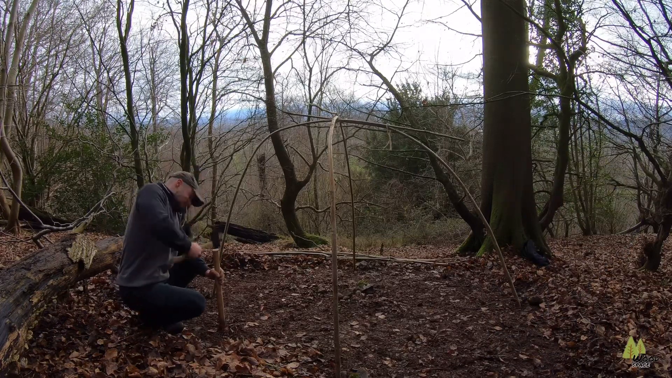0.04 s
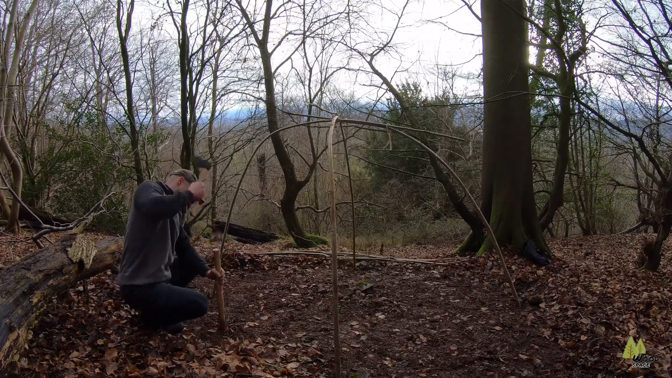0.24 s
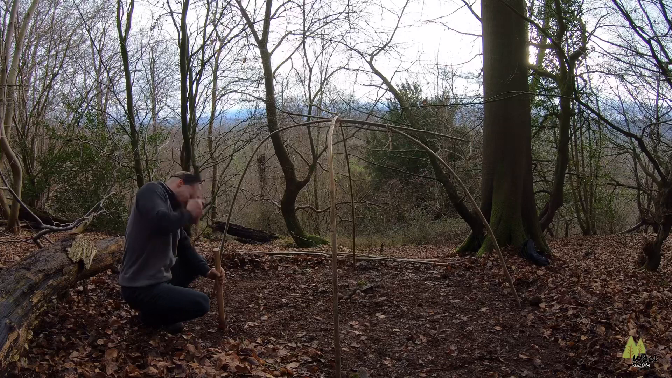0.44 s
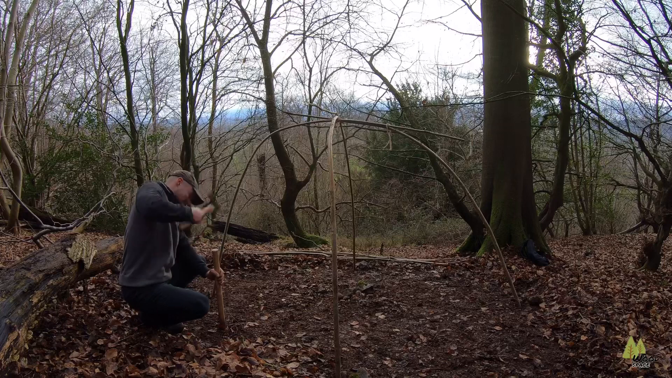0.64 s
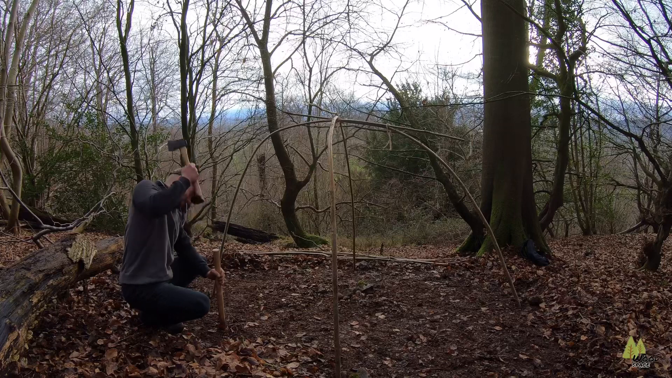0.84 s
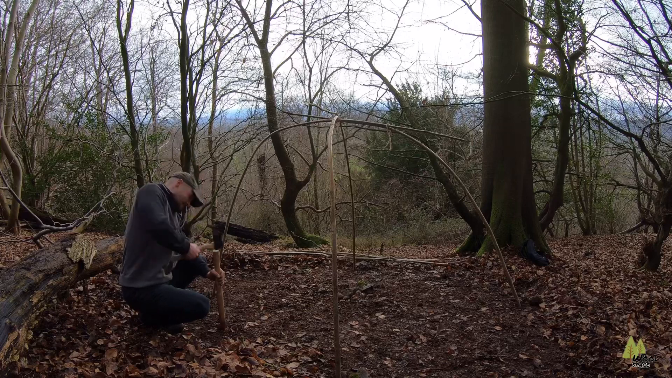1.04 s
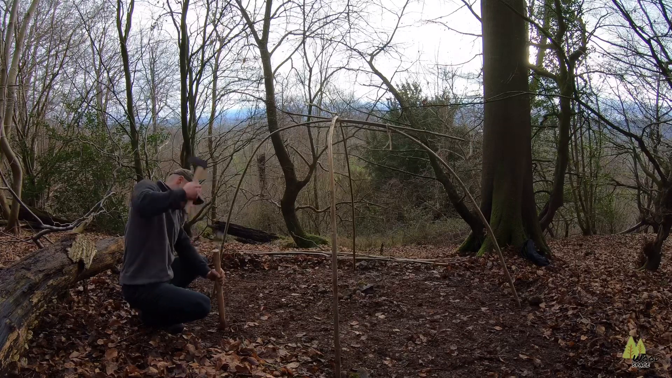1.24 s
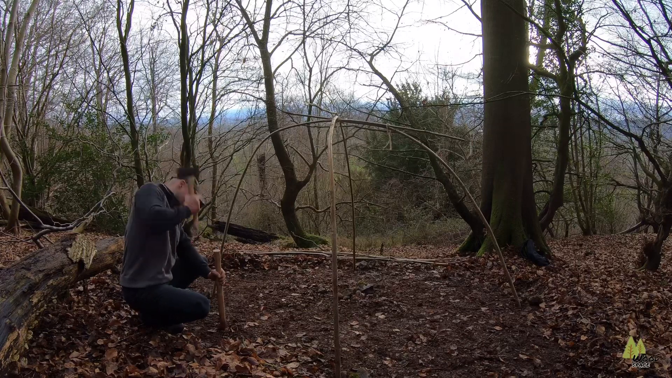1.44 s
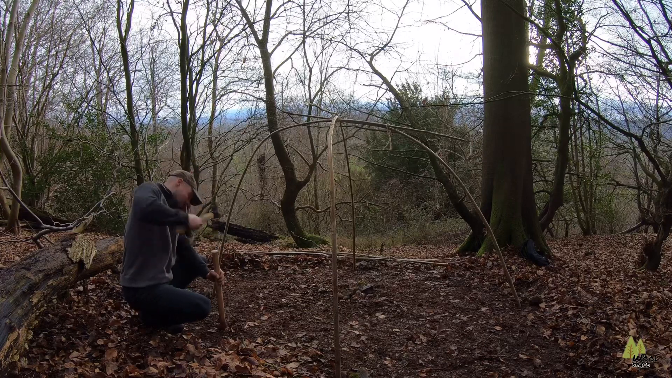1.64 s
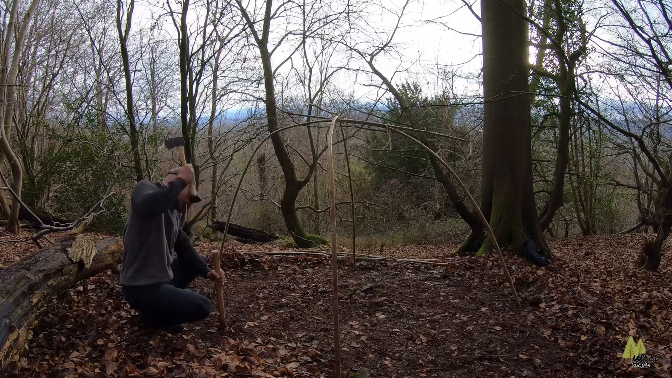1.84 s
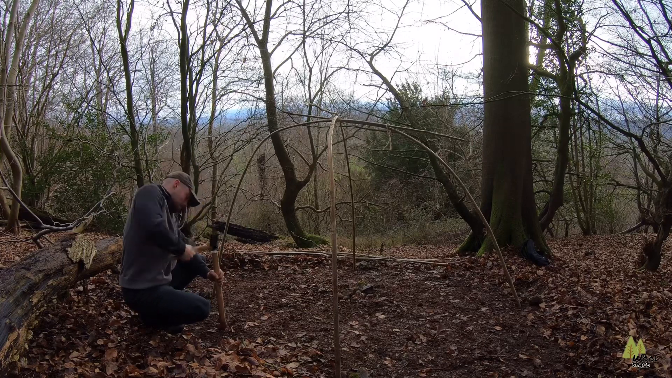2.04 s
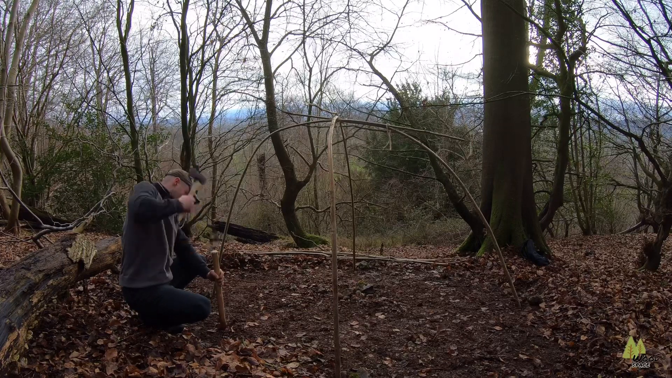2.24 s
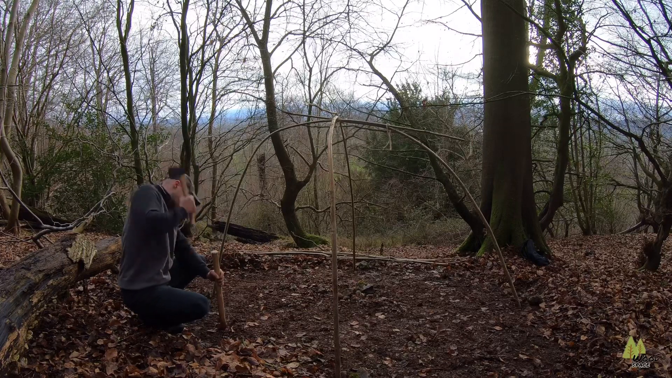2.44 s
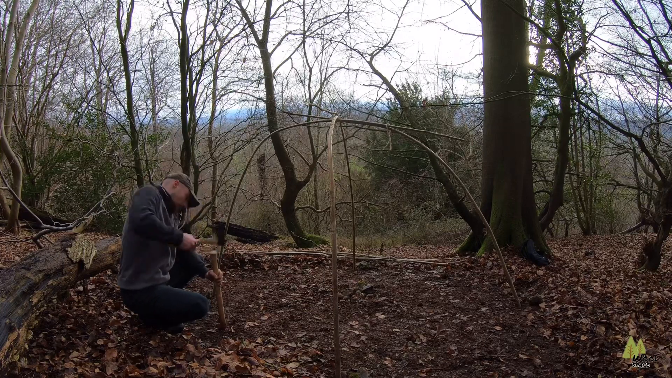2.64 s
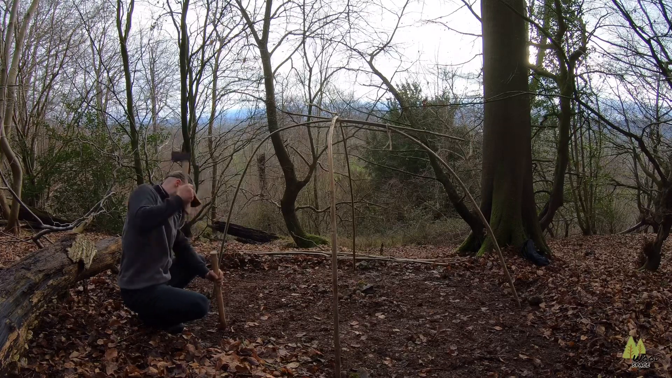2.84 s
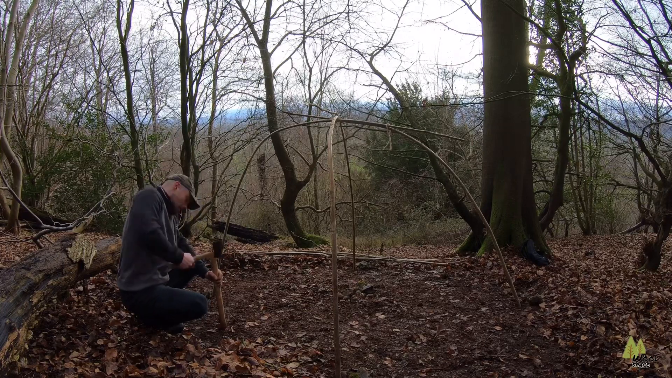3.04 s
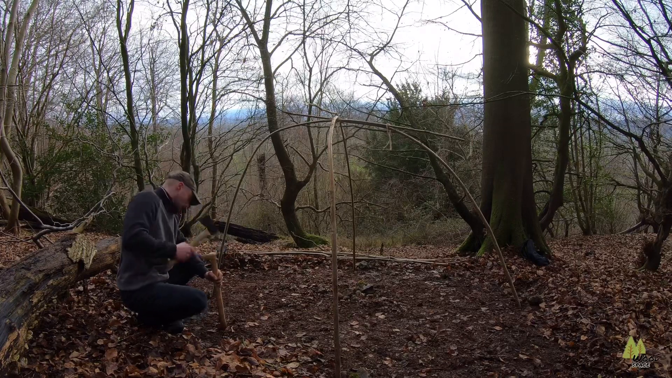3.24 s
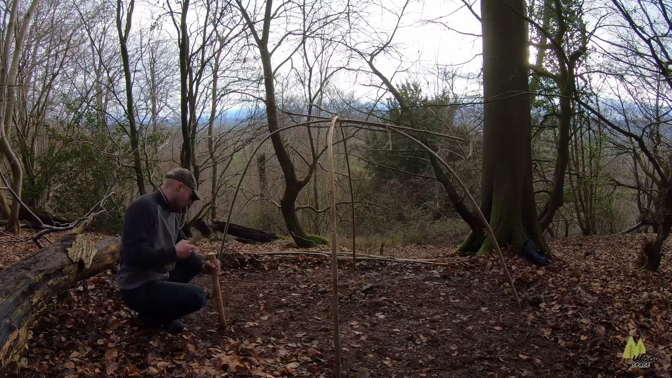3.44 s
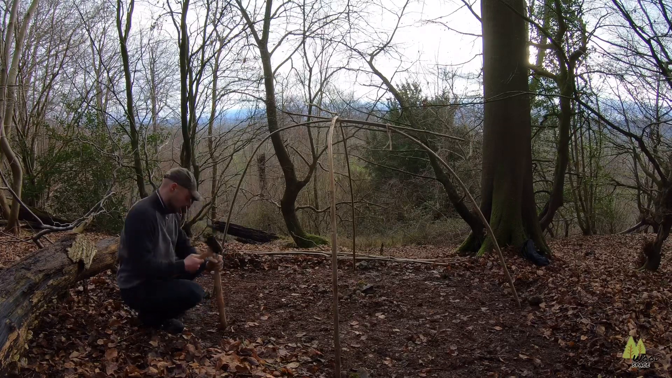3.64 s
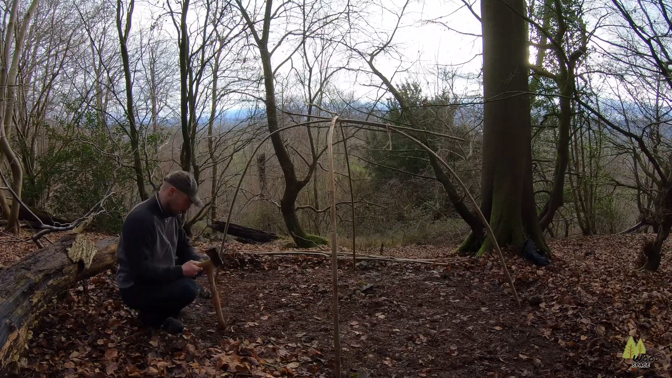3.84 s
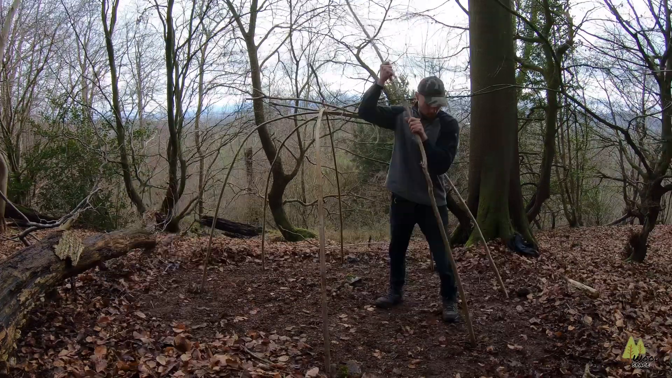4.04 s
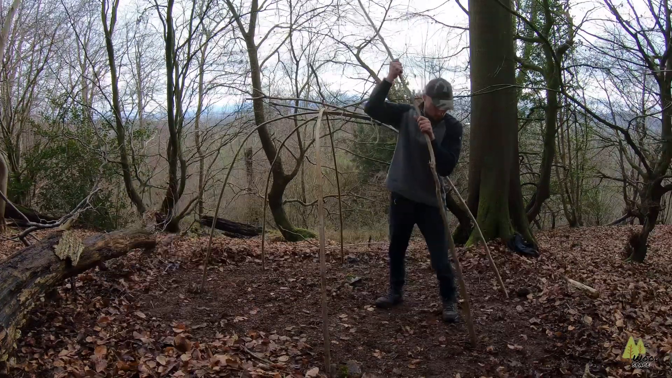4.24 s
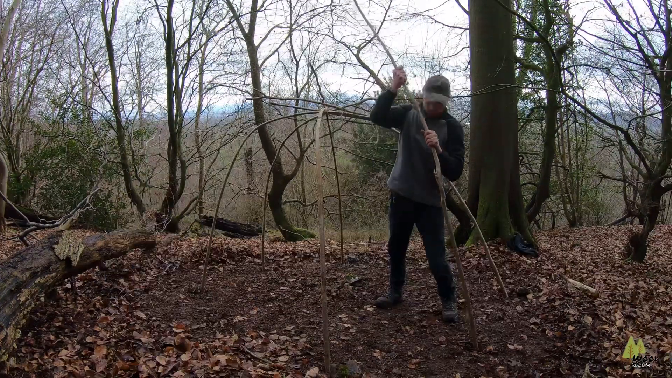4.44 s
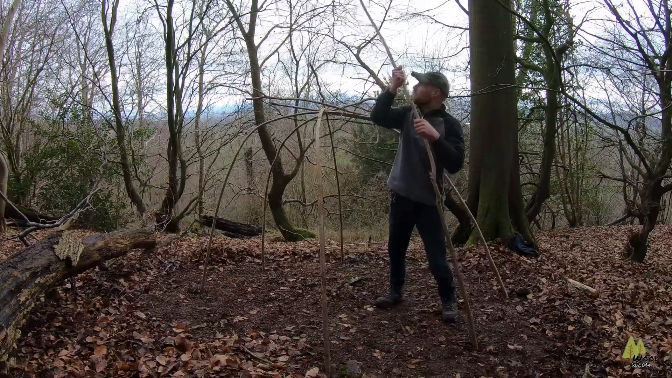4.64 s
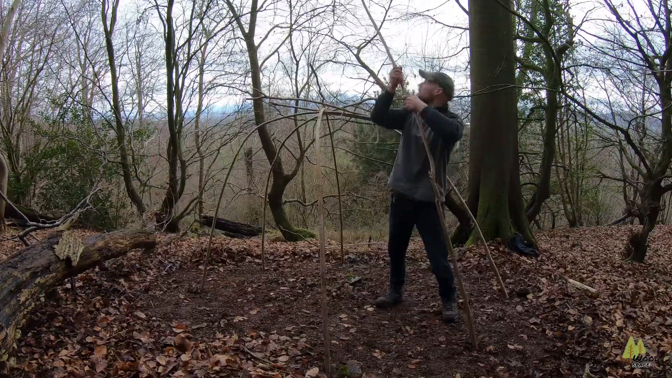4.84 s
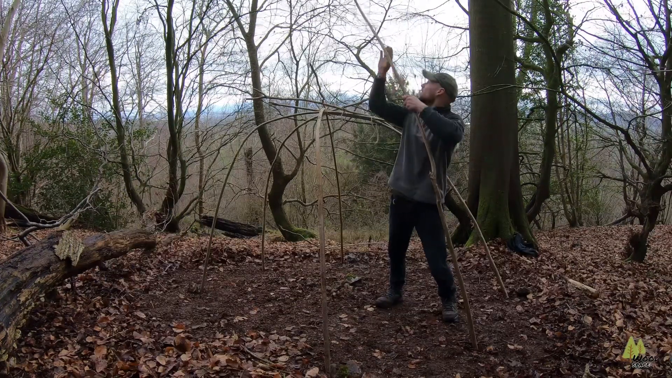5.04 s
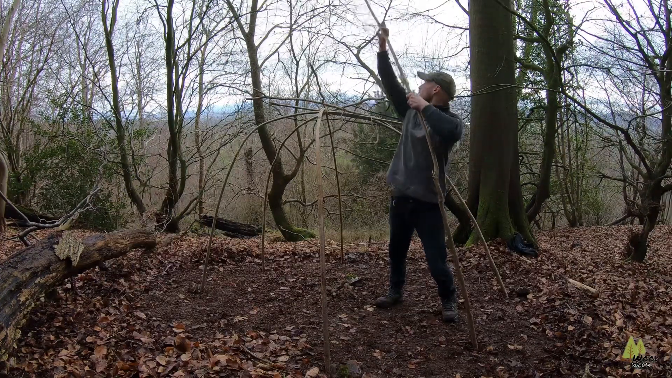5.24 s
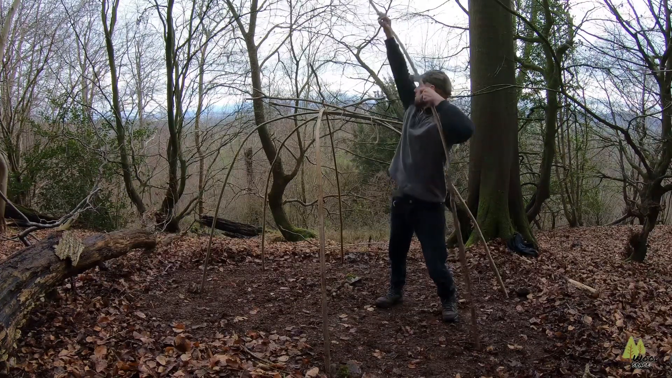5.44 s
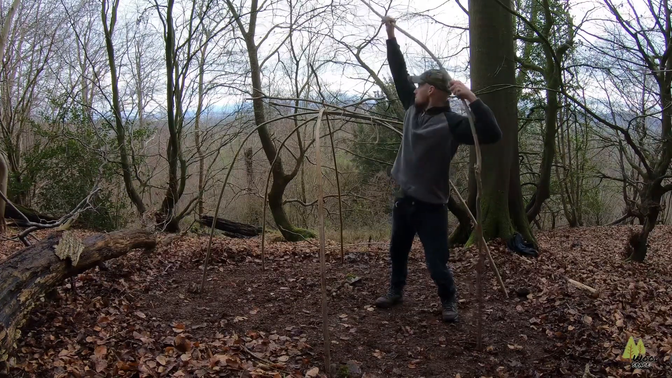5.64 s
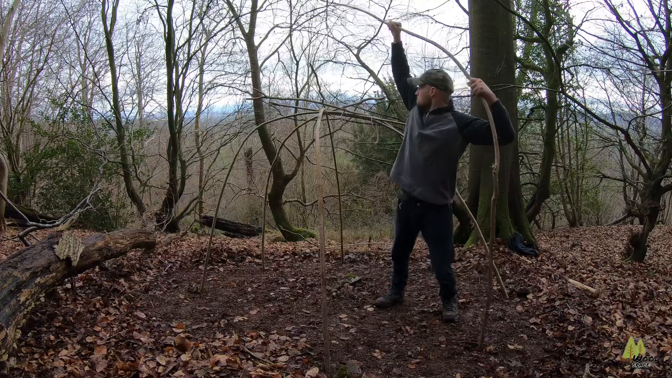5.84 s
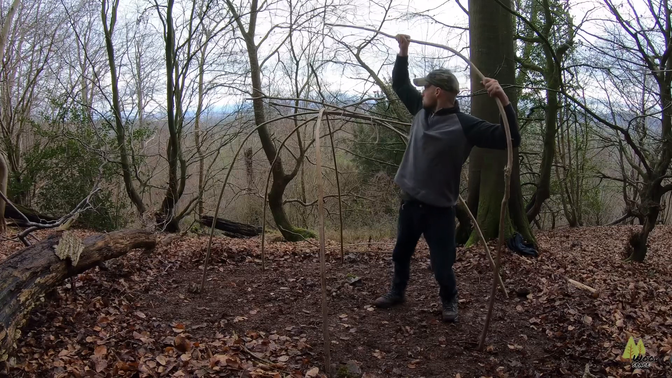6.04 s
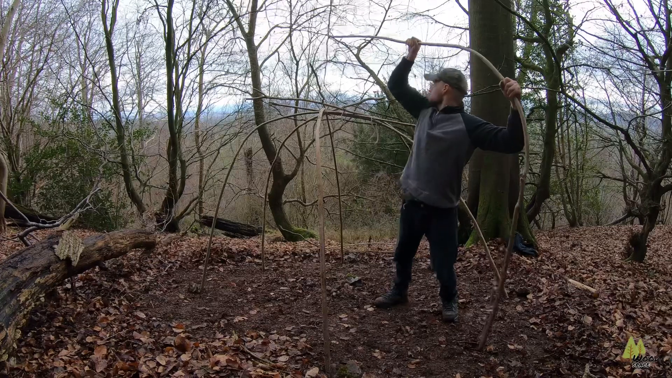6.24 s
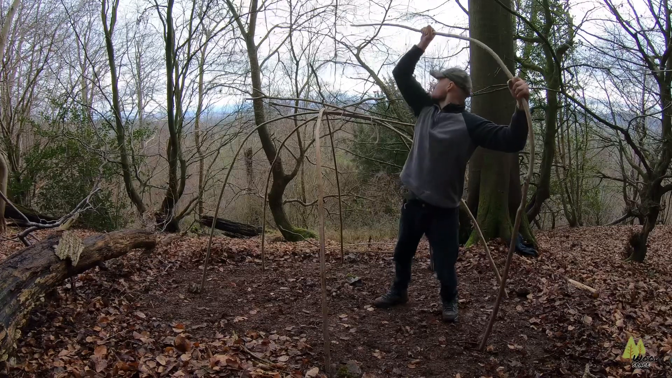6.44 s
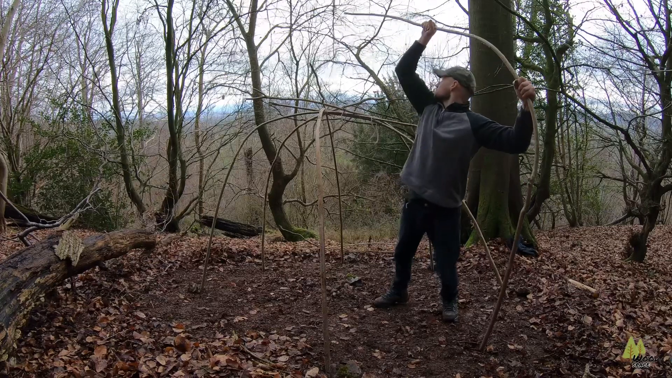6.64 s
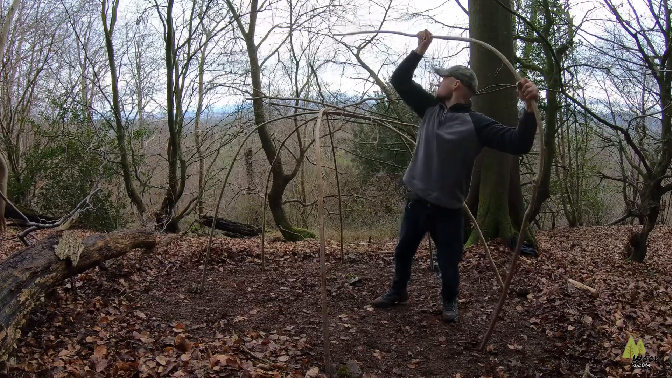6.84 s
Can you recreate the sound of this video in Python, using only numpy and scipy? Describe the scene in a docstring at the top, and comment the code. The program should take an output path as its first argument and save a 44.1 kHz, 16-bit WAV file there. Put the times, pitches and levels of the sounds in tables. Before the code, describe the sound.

A stake is hammered into soil twice a second with ringing woodland echoes; after a brief silence, a pole crunches in and twigs creak.

```python
"""A wooden stake takes seven blows into a forest floor: damped modes crack, soil modes thump and
decaying noise scatters back from the trunks, with an earlier blow's echo still fading at the start.
After a moment of silence a long pole is jabbed into the ground and bent over, with noise bursts for
crunch and snaps, while boots shift and grainy noise rustles as dry leaves.
Distant air in coloured noise and a few thin, wavering sine bird whistles lie behind."""
import sys
import numpy as np
from scipy import signal
from scipy.fft import rfft, irfft, next_fast_len
from scipy.io import wavfile
from scipy.ndimage import uniform_filter1d

SR = 44100
rng = np.random.default_rng(int(sys.argv[2]) if len(sys.argv) > 2 else 0)


def transcribe(signal):
    """Save signal, clipped to [-1, 1], as a 16-bit WAV file at the path in sys.argv[1]."""
    frames = np.atleast_2d(signal).T
    limited = np.clip(frames, -1, 1)
    pcm = np.round(limited * 32767).astype(np.int16)
    wavfile.write(sys.argv[1], SR, pcm)


N = 304274
T = np.arange(N) / SR
AGE = T[:SR // 4]  # time since a short sound began, in seconds
ECHO_AGE = T[:SR]  # the same for longer sounds

# All levels inside a layer are relative, before that layer's mix level and panning.
# distant air: (frequency [Hz], level [dB])
AIR_COLOUR = [(25, -17), (70, -5.5), (115, -8.5), (165, 3), (300, -5.5), (520, -10.5), (820, -4.5),
              (1350, -10), (2000, -21), (3300, -26.5), (5000, -28.5), (7000, -33.5), (8200, -46.5),
              (14000, -59)]
AIR_BEFORE_DB, AIR_AFTER_DB = -62, -60  # before and after the silence ends
# moment of silence: (start [s], end [s])
SILENCE = (4.062, 4.112)

# scatter from the trunks: (frequency [Hz], level [dB], 60 dB decay time [s])
TRUNK_ECHO = [(250, -20.5, .7), (548, -19.5, .8), (889.6, -7, .75), (1593, 0.5, .85), (2600, -1, 1),
              (4000, -1, .92), (5200, -7, .62), (6600, -10, .52), (7600, -6.5, .45), (8430, -18.5, .44),
              (10500, -19, .44), (12000, -39, .44)]
ECHO_DB, EARLIER_BLOW_S = -44.5, 0.39  # the earlier blow fell this long before the start

# blows on the stake: (time [s], crack level [dB], pitch factor [1],
# knock frequency before slight lowering [Hz], knock level [dB], rasp level [dB], thump level [dB],
# early echo boost [dB], echo edge [Hz], echo tilt [dB per octave], echo hold [s])
BLOWS = [(0.064, -1.5, 1.033, 796, -13.5, -22, -17, 0.5, 4200, 1.3, 0.12),
         (0.555, -3.5, 1.02, 817, -14, -16.5, -15.7, 3.5, 3850, 0, .12),
         (1.0627, -3.5, 1.0, 845, -13, -25, -15.5, 5, 3897, -0.6, .12),
         (1.5613, -2, 1.024, 830, -17, -17, -15, 4.5, 4100, -0.25, .12),
         (2.057, -3.5, 0.99, 772, -15, -16.5, -15.5, 11, 3460, -1.1, 0.1),
         (2.572, -12, 0.95, 1030, 0, -7, -13.7, 21, 2100, -1, .035),
         (3.058, -7.5, .95, 1090, -7.5, -22, -15.5, 13.5, 4300, -1.4, 0.093)]
# stake damped by hand and soil: (frequency before pitch factor [Hz], level [dB], swell time [ms])
STAKE_MODES = [(1670, -14.5, 1.3), (2300, -2, 1.15), (3473, -5.5, 0.96), (4600, -18, 0.68),
               (5600, -26, 0.59), (8500, -36, .5)]
KNOCK_SWELL_MS = 1.4  # the hollow knock peaks this late
# crushed fibres at the stake's head: (frequency [Hz], level [dB])
RASP_COLOUR = [(200, -6), (380, 0), (560, -10), (1400, 2), (2500, -1), (4300, 0.5), (5500, -8.5),
               (8000, -21), (11000, -32.5), (15000, -50)]
# the stake's brief buzz with the crack: (frequency [Hz], level [dB])
BUZZ_COLOUR = [(500, -28), (850, -4), (1150, -12), (1550, -1.5), (2400, 1), (4200, -1), (5200, -9.5),
               (8000, -20.5), (14000, -42)]
BUZZ_DB = -31.5  # under the crack level
# springy soil: (frequency [Hz], level [dB], swell time [ms], steepness [1])
SOIL_MODES = [(177, 2, 9.3, 6), (71.03, -18, 15, 1.4), (87.04, -26.5, 11, 2), (162, -16, 16, 1.8),
              (248.4, -14.5, 7.1, 2), (300, -17, 4.5, 2.6)]
# thump and weaker repeats: (delay after the soil lag [s], level [dB])
THROBS = [(0, 3), (0.0414, -19.5), (0.062, -32), (0.092, -30.5)]
SOIL_LAG_S = 0.0021

# bird whistles: (time [s], length [s], start frequency [Hz], end frequency [Hz], level [dB])
BIRD_WHISTLES = [(0.385, 0.26, 7700, 6950, -85), (0.822, 0.13, 7180, 7040, -86),
                 (2.83, 0.14, 4130, 4080, -74), (3.465, 0.27, 7220, 7050, -76),
                 (3.799, 0.26, 5170, 5200, -78)]

# dry leaves: (frequency [Hz], level [dB])
LEAF_COLOUR = [(1200, -22), (2300, -7), (3500, 1), (4600, -4.5), (6200, -1.5), (8000, -9.5), (10000, -15),
               (12000, -34), (15000, -32)]
# movements that stir leaves and clothing: (time [s], length [s], level [dB])
STIRS = [(3.392, 0.088, -73.5), (4.45, 0.44, -68), (4.87, .21, -66), (5.219, 0.24, -65), (5.597, 0.15, -62)]
STIR_ATTACK_S, STIR_RELEASE_S = 0.029, 0.024
FIDGET_DB = -69.5  # middle level of the faint rustle while the pole is handled

# the pole's shaft: (frequency [Hz], level [dB], swell time [ms])
SHAFT_MODES = [(275, -8, 11), (441, -14, 6), (1570, -16, 2.5)]
# litter under the pole's point: (frequency [Hz], level [dB])
CRUNCH_COLOUR = [(150, 0), (330, 8.5), (500, -1), (800, -3.5), (1550, -1.5), (2100, -7), (3200, -2),
                 (4200, -12.5), (6000, -9.5), (8000, -22.5), (10000, -24), (15000, -64)]
# the pole's clacking wood: (frequency [Hz], level [dB], swell time [ms])
POLE_MODES = [(2450, -13, 1.8), (3330, -1, 1.7), (3800, -5.5, 1.6), (900, -14, 1.5)]
# the pole rammed home; its soil thump plays at the pitch factor
JAB_S, JAB_THUMP_DB, JAB_CRUNCH_DB, JAB_ECHO_DB, JAB_PITCH = 4.3885, -16.5, -19.5, -49.5, .9
CLACK_S, CLACK_DB = 4.422, -17  # it clacks as it rebounds

# creaking wood and snapping twigs: (time [s], level [dB], centre [Hz], hiss level [dB])
SNAPS = [(4.4219, -33.5, 2500, -15), (4.6089, -48, 3260, -.5), (5.1338, -62, 7010, -11),
         (5.234, -63, 4520, 8), (5.3947, -57, 4000, 5), (5.5944, -44, 2990, 6.5), (5.615, -48, 3110, 2.5),
         (5.6408, -45, 2830, -2), (5.7145, -45, 2700, -7), (5.731, -49, 3030, -0.5),
         (5.7435, -50, 2600, -3), (5.81, -54.5, 2950, -4.5), (5.935, -46, 2600, -11),
         (5.95, -44.5, 2950, -14), (5.961, -50, 2600, -5), (5.9867, -37.5, 2470, -30),
         (6.0544, -45, 2650, -17), (6.159, -57, 2800, -10), (6.6545, -59, 5486, 5.5)]
# leaves shaken by a snap: (frequency [Hz], level [dB])
SNAP_HISS_COLOUR = [(500, -7), (1500, 1), (3000, -0.5), (6200, 7.5), (9500, -6.5), (12000, -31.5),
                    (15000, -28)]
SNAP_SWELL_MS = 1.53

# litter crushed by a boot: (frequency [Hz], level [dB])
LITTER_COLOUR = [(100, -20), (270, 8), (480, -8), (950, 3), (1300, -9), (2800, -6), (4200, -14),
                 (8000, -21), (12000, -54)]
STEP_S, STEP_LENGTH_S, STEP_DB, STEP_ATTACK_S, STEP_RELEASE_S = 5.915, .1, -49.5, .032, .055
# low rumble while the man shifts his weight: (frequency [Hz], level [dB])
RUMBLE_COLOUR = [(15, -5), (35, -4), (60, -6.5), (100, -12), (200, -14.5), (500, -68)]
RUMBLE_S, RUMBLE_LENGTH_S, RUMBLE_DB = 5.92, 0.916, -60.5
# soft, deep bumps in the rumble: (time [s], level [dB], frequency [Hz], swell time [ms])
BUMPS = [(6.054, -49, 40, 34), (6.628, -40.5, 45, 11.4), (6.725, -51.5, 42, 23)]

CLIP_LEVEL, TOP_HZ = .86, 16400


def undb(db):
    """Decibels to gain."""
    return 10 ** (np.asarray(db) / 20)


def unit(x):
    """Scale to rms 1."""
    return x / np.sqrt(np.mean(x ** 2))


def add(out, s, x):
    """Mix a sound in at time s."""
    i = int(s * SR)
    out[:, i:i + x.shape[-1]] += x[..., :N - i]


def on_log(hz, points):
    """Read (Hz, value) points on a log-frequency axis."""
    f, value = np.transpose(points)
    return np.interp(np.log(hz + 1), np.log(f), value)


def colour(x, points):
    """Weight a sound's spectrum by (Hz, dB) points, at rms 1."""
    size = next_fast_len(x.shape[-1], real=True)
    gain = undb(on_log(np.fft.rfftfreq(size, 1 / SR), points))
    shaped = irfft(rfft(x, size) * gain, size)
    return unit(shaped[..., :x.shape[-1]])


def pan(x, left_db):
    """Lean a sound to the left by a level difference; negative leans right."""
    return x * undb(np.array([[left_db], [-left_db]]) / 2)


def noise(size, side_db, grain_db=0):
    """Stereo noise; widely scattered sample sizes turn it into grains."""
    grains = undb(grain_db * rng.standard_normal(size))
    mid, side = rng.standard_normal((2, size)) * grains
    return unit(mid + undb(side_db) * np.array([side, -side]))


def walk(rate, size):
    """Smoothed random steps at rms 1, for slow chance."""
    k = int(SR / rate)
    steps = np.repeat(rng.standard_normal(size // k + 1), k)
    return unit(uniform_filter1d(steps, k)[:size])


def swell(ms, steepness):
    """Envelope that builds to 1 in the given time and dies away."""
    u = AGE * 1000 / ms
    return (u * np.exp(1 - u)) ** steepness


def gesture(s, length_s, attack_s, release_s):
    """Envelope of a movement: it builds, holds to the end of its length and dies away."""
    attack = np.clip((T - s) / attack_s, 0, 1)
    return attack * np.exp(-np.maximum(T - s - length_s, 0) / release_s)


def ring(modes, pitch):
    """Wood rings for a few cycles while it is in contact: sines under short swells."""
    return sum(undb(db) * swell(ms, 2.4) * np.sin(2 * np.pi * hz * pitch * AGE) for hz, db, ms in modes)


def air():
    """A distant, nearly steady wash whose stereo width varies with frequency."""
    mid, side = (colour(rng.standard_normal(N), AIR_COLOUR) for _ in range(2))
    width = [(100, -3.0), (380, -8), (700, 2.5), (4000, -2), (10000, 6.0)]
    side = undb(-4.5) * colour(side, width)
    db = np.where(T < SILENCE[1], AIR_BEFORE_DB, AIR_AFTER_DB)
    return undb(db + 0.44 * walk(5, N)) * (mid + np.array([side, -side]))


def trunks(edge_hz, tilt_db, hold_s=0.14, early_db=3, edge_drop_db=10):
    """Echoes of many trunks hold briefly, then fade at a rate set by each frequency band."""
    hz = np.fft.rfftfreq(SR, 1 / SR)
    table = np.array(TRUNK_ECHO)
    tilt = tilt_db * np.log2((hz + 1) / 2000)
    # a softer contact sends out less above its edge frequency
    edge_drop = edge_drop_db * (1 - 1 / (1 + (hz / edge_hz) ** 18))
    db = on_log(hz, table[:, :2]) + tilt - edge_drop
    # paths of nearly equal length ripple the spectrum
    db = db + 1.8 * walk(500, len(hz))
    grains = rfft(noise(SR, side_db=-4, grain_db=4))
    scatter = rfft(unit(irfft(grains * undb(db))))
    # half-octave bands around 1330 Hz
    band = np.round(2 * np.log2(np.clip(hz, 700, 7000) / 1330)) / 2
    fading = np.maximum(ECHO_AGE - hold_s, 0)
    out = 0
    for octave in np.unique(band):
        t60 = on_log(1330 * 2 ** octave, table[:, ::2])
        out = out + irfft(scatter * (band == octave)) * np.exp(-np.log(1000) * fading / t60)
    # quick onset with a decaying early boost
    near = undb(early_db * np.exp(-ECHO_AGE / .025)) * (1 - np.exp(-ECHO_AGE / .002))
    return pan(out * near * undb(1.0 * walk(70, SR)), -1.0)


def crack(pitch, knock_hz, knock_db, rasp_db):
    """Stake modes ring over a knock set by where the head lands; fibres rasp and the wood buzzes."""
    knock = ring([(knock_hz, knock_db, KNOCK_SWELL_MS)], 0.99)
    rasp = colour(noise(len(AGE), side_db=-8), RASP_COLOUR) * swell(1.1, 1.568)
    buzz = colour(noise(len(AGE), side_db=-6), BUZZ_COLOUR) * swell(3.2, 1.3)
    wood = pan(ring(STAKE_MODES, pitch) + knock, 2.3)
    return wood + undb(rasp_db) * rasp + undb(BUZZ_DB) * buzz


def thump():
    """Springy soil answers a little late with weaker throbs, over a low noise tail."""
    wave = sum(undb(db) * swell(ms, steep) * np.sin(2 * np.pi * hz * AGE)
               for hz, db, ms, steep in SOIL_MODES)
    throbs = sum(undb(db) * np.interp(AGE - SOIL_LAG_S - lag, AGE, wave, left=0) for lag, db in THROBS)
    tail_colour = [(30, -25.0), (70, -0.5), (200, 2.5), (280, -4), (330, -17), (600, -35.5),
                   (2000, -70.5)]
    tail = colour(noise(len(AGE), side_db=-9.5), tail_colour)
    return pan(throbs, -1.1) + undb(-29) * tail * swell(24, 0.41)


def hammering():
    """Each blow cracks, thumps and scatters back; an earlier blow is dying away at the start."""
    out = np.zeros((2, N))
    earlier = trunks(4200, .3, hold_s=0.089)[:, int(EARLIER_BLOW_S * SR):]
    add(out, 0, undb(ECHO_DB) * earlier)
    for (s, crack_db, pitch, knock_hz, knock_db, rasp_db, thump_db,
         early_db, edge_hz, tilt_db, hold_s) in BLOWS:
        add(out, s, undb(crack_db) * crack(pitch, knock_hz, knock_db, rasp_db))
        add(out, s, undb(thump_db) * thump())
        add(out, s, undb(ECHO_DB) * trunks(edge_hz, tilt_db, hold_s, early_db))
    return out


def birds():
    """Thin far-off whistles: gliding sines that waver in pitch and level."""
    out = np.zeros((2, N))
    for s, length, start_hz, end_hz, db in BIRD_WHISTLES:
        progress = np.clip(ECHO_AGE / length, 0, 1)
        glide = start_hz + (end_hz - start_hz) * progress
        hz = glide * (1 + 0.0094 * walk(500, SR))
        envelope = np.sqrt(4 * progress * (1 - progress)) * undb(db + 2 * walk(71.4, SR))
        add(out, s, envelope * np.sin(2 * np.pi * np.cumsum(hz) / SR))
    return out


def leaves():
    """Grainy noise crackles with each movement, and faintly throughout after the silence."""
    grains = colour(noise(N, side_db=-5.5, grain_db=5), LEAF_COLOUR)
    crackle = grains * undb(1.07 * walk(81, N))
    fidget = undb(FIDGET_DB + 2.3 * walk(8.5, N)) * (T > SILENCE[1])
    stirs = [undb(db) * gesture(s, length, STIR_ATTACK_S, STIR_RELEASE_S) for s, length, db in STIRS]
    # levels add as powers
    level = np.sqrt(fidget ** 2 + np.sum(np.square(stirs), axis=0))
    return pan(crackle * level, -0.75)


def pole():
    """The point crunches litter and thumps soil while the shaft sounds low; then the wood clacks."""
    out = np.zeros((2, N))
    # slower playback deepens the thump
    deep = np.array([np.interp(AGE * JAB_PITCH, AGE, side) for side in thump()])
    crunch = pan(colour(noise(len(AGE), side_db=-5), CRUNCH_COLOUR), -.8)
    crunch_envelope = swell(1.85, 1.35) + undb(-16.5) * swell(11.4, 0.55)
    add(out, JAB_S - .0015, undb(JAB_THUMP_DB) * (deep + ring(SHAFT_MODES, 1)))
    add(out, JAB_S, undb(JAB_CRUNCH_DB) * crunch * crunch_envelope)
    add(out, JAB_S, undb(JAB_ECHO_DB) * trunks(8300, .5) * np.exp(-ECHO_AGE / 0.094))
    add(out, CLACK_S, undb(CLACK_DB) * pan(ring(POLE_MODES, 1), -1.5))
    return out


def snaps():
    """Each snap bursts in a broad woody band and hisses in the leaves, with a weak slower tail."""
    out = np.zeros((2, N))
    envelope = swell(SNAP_SWELL_MS, 0.63) + undb(-17) * swell(13.0, 0.81)
    for s, db, hz, hiss_db in SNAPS:
        woody = [(hz / 8, -22), (hz / 2, -15), (hz / 1.1, -3), (hz * 1.13, 0), (hz * 1.53, -19),
                 (hz * 4, -50)]
        body = colour(noise(len(AGE), side_db=-11, grain_db=4), woody)
        hiss = colour(noise(len(AGE), side_db=-1.5, grain_db=8.5), SNAP_HISS_COLOUR)
        add(out, s, undb(db) * (body + undb(hiss_db) * hiss) * envelope)
    return pan(out, -2.0)


def boots():
    """A boot crushes litter as grainy noise; the shifting weight rumbles, with a few deep bumps."""
    grains = colour(noise(N, side_db=-11.5, grain_db=3), LITTER_COLOUR)
    crush = grains * undb(2.0 * walk(110, N))
    step = undb(STEP_DB) * crush * gesture(STEP_S, STEP_LENGTH_S, STEP_ATTACK_S, STEP_RELEASE_S)
    rumble = colour(noise(N, side_db=-2), RUMBLE_COLOUR) * undb(RUMBLE_DB + 3.4 * walk(14, N))
    low = rumble * gesture(RUMBLE_S, RUMBLE_LENGTH_S, attack_s=.04, release_s=0.029)
    for s, db, hz, ms in BUMPS:
        add(low, s, undb(db) * swell(ms, 1.4) * np.sin(2 * np.pi * hz * AGE))
    return pan(step, -1.0) + pan(low, 6.5)


def scene():
    """Everything in the clearing."""
    return air() + hammering() + birds() + leaves() + pole() + snaps() + boots()


def record(dry):
    """The sound drops out for a moment, peaks overload at a hard ceiling and the top is cut."""
    live = 1. * ((T < SILENCE[0]) | (T > SILENCE[1]))
    # about 2 ms of smoothing softens the edges of the silence
    live = uniform_filter1d(live, size=100)
    squashed = np.clip(dry * live, -CLIP_LEVEL, CLIP_LEVEL)
    top_cut = signal.ellip(8, .2, 70, TOP_HZ, fs=SR, output="sos")
    return signal.sosfilt(top_cut, squashed)


dry = scene()
out = record(dry)
transcribe(out)
```